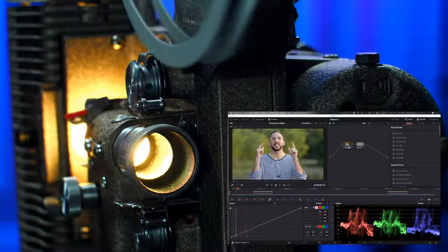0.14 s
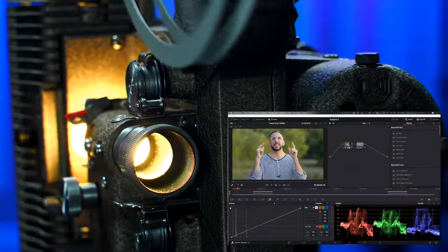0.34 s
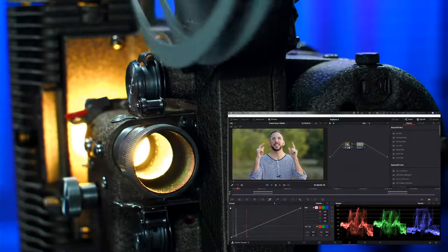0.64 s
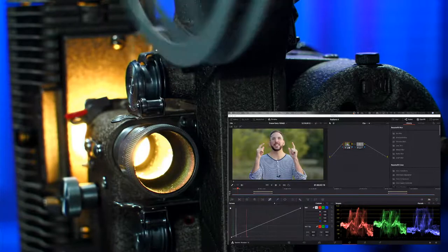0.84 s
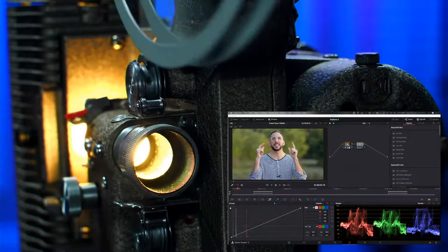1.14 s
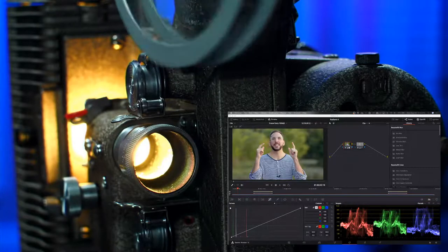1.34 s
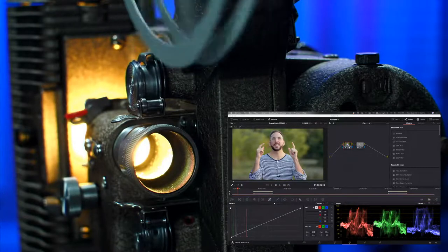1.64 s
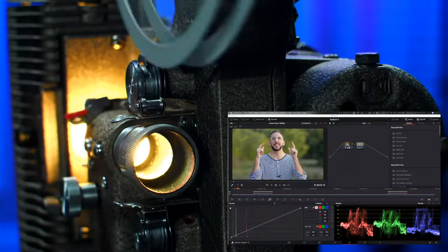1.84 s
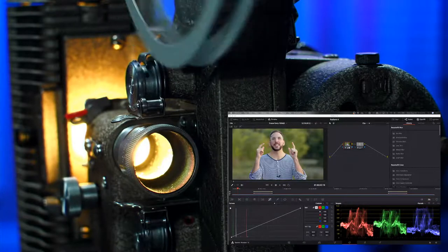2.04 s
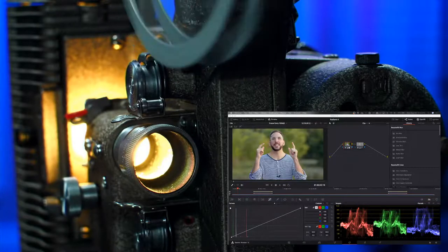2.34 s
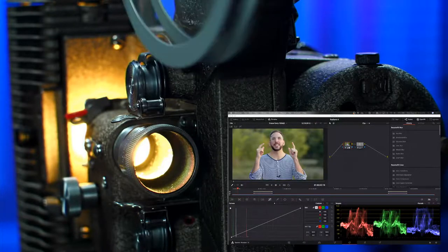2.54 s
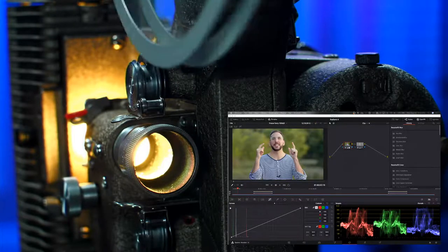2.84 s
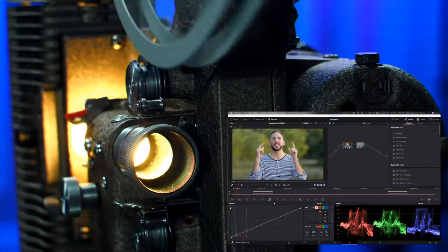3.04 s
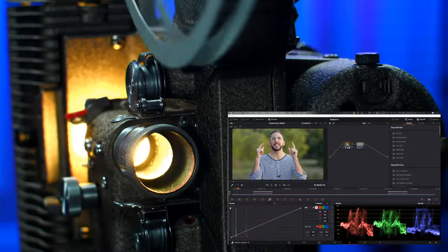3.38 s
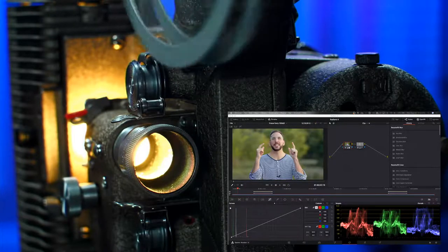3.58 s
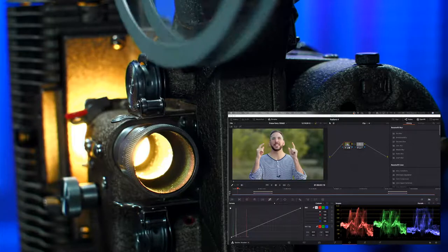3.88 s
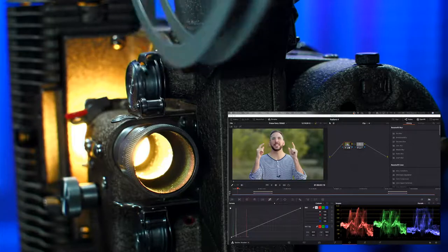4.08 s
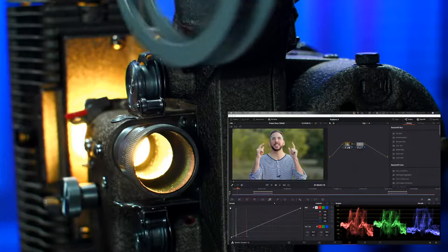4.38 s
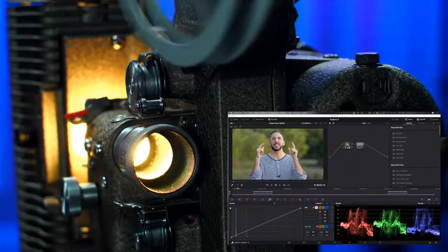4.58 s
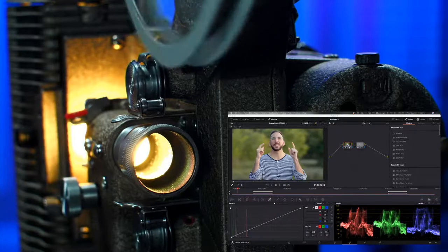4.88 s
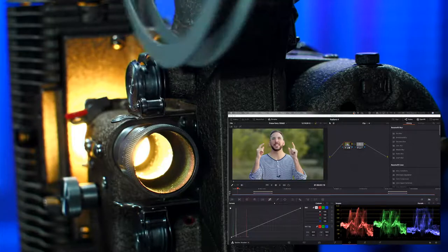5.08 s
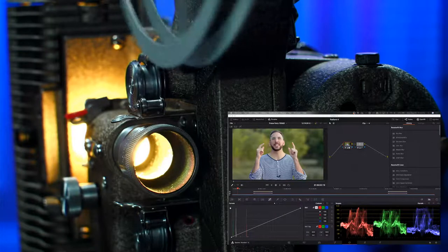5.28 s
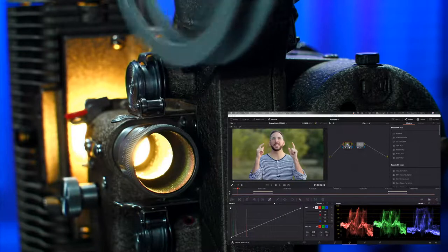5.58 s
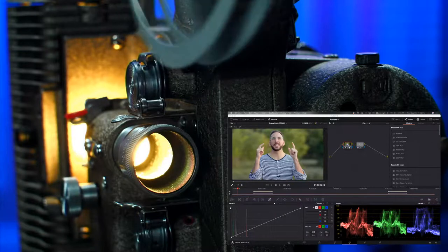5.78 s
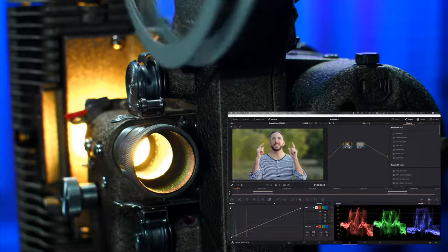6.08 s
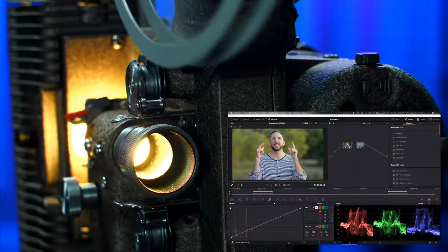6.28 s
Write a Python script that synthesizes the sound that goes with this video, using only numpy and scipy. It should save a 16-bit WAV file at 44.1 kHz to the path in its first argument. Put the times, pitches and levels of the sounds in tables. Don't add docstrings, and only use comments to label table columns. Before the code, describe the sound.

From 0 to about 6.4 seconds an old film projector runs without a break, close to one microphone indoors, dry and mono. The motor gives a rough, many-toned hum, strongest from about 500 to 1800 hertz, with idler gear tones beating against it and a shutter drone and roller whirr blended in. A loose panel buzzes most clearly in the first second, then its tone shifts and weakens as the motor speeds up slightly until about 2 seconds, later varying gently. Bright steel ticks repeat about sixteen times a second, some harder, as near 1.2 and 5.7, some weaker, as near 2.0 and 2.6, each followed by a faint return tick. A high, gritty bearing scrape flutters about seventy-six times a second, easing briefly near 2.0 and swelling around 2.7. Cooling fan air rushes constantly through the housing over very faint mains hum and hiss. The sound cuts off still running.

```python
import sys
import numpy as np
from scipy import signal
from scipy.fft import rfft, irfft, next_fast_len
from scipy.io import wavfile

SR = 44100
rng = np.random.default_rng(int(sys.argv[2]) if len(sys.argv) > 2 else 0)


def generate_wav(signal):
    frames = np.transpose(np.atleast_2d(signal))
    scaled = np.clip(frames, -1, 1) * 32767
    pcm = np.round(scaled).astype(np.int16)
    wavfile.write(sys.argv[1], SR, pcm)


def to_linear_factor(level_db):
    exponent = np.asarray(level_db, float) / 20
    return 10 ** exponent


N = 283122

FIRST_STROKE, FRAME = 1.4, 4.775
BLADES = 3 / FRAME


def unit(x):
    return x / np.sqrt(np.mean(x ** 2) + 1e-20)


def over_time(rows):
    start_s, value = np.transpose(rows)
    return np.interp(np.arange(N) / SR, start_s, value)


def straight_pieces(knots, rate):
    return np.interp(np.arange(N) * rate / SR, np.arange(len(knots)), knots)


def wobble(rate):
    return straight_pieces(rng.standard_normal(int(N * rate / SR) + 2), rate)


def sway(depth_db, rate):
    knots = rng.standard_normal(int(N * rate / SR) + 2)
    return straight_pieces(to_linear_factor(depth_db * knots), rate)


def filtered(x, response):
    m = next_fast_len(N + 8192)
    return irfft(rfft(x, m) * response(np.fft.rfftfreq(m, 1 / SR)), m)[:N]


def resonances(modes):
    def response(f):
        total = 0
        for k, (pitch, width, db) in enumerate(modes):
            damping = 1j * f * width
            total = total + (-1) ** k * to_linear_factor(db) * damping / (pitch * pitch - f * f + damping)
        return total
    return response


# start_s, speed [turns a second]
SHAFT_SPEED = [(0.0, 75.18), (0.64, 75.538), (1.28, 75.658), (1.93, 76.182), (2.57, 76.084), (3.21, 75.817),
               (3.85, 75.842), (4.49, 75.744), (5.14, 75.765), (5.78, 75.898), (6.42, 76.122)]


def speed():
    reel_turn_s = .87
    reel = 2 * np.pi * np.arange(N) / SR / reel_turn_s
    return over_time(SHAFT_SPEED) + .118 * np.cos(reel) + .05 * np.cos(2 * reel + 2.29)


def turns():
    return np.cumsum(speed()) / SR


def drone(orders, levels_db, unsteady_db, rate):
    knock_at = .955
    since_knock = turns() - knock_at
    total = 0
    for order, db in zip(orders, levels_db):
        loose = rng.standard_normal() * (.12 if order > 24.5 else 9)
        phase = ((order * since_knock + loose) % 1).astype(np.float32)
        total = total + to_linear_factor(db) * sway(unsteady_db, rate) * np.cos(2 * np.pi * phase)
    return np.sqrt(2) * total


# order [multiple of the shaft], level_db [rms]
SHAFT_ORDERS = [(1, -87.4), (4, -64.5), (5, -65.5), (6, -57.0), (7, -43.5), (8, -47.0), (9, -56.1),
                (10, -51.3), (11, -44.1), (12, -61.7), (14, -61.4), (15, -50.9), (16, -53.6), (17, -59.2),
                (18, -54.3), (19, -66.9), (20, -59.4), (21, -52.2), (22, -62.9), (23, -48.8), (25, -68.4),
                (26, -57.5), (27, -66.0), (28, -69.4), (31, -62.9), (33, -63.1), (34, -63.1), (38, -62.4),
                (39, -69.0)]


def motor():
    steady = [row for row in SHAFT_ORDERS if row[0] not in (10, 16)]
    order, level_db = np.transpose(steady)
    return drone(order, level_db, unsteady_db=1.13, rate=12)


# shaft [multiple of the shaft], idler [multiple of the idler, 0 for the
# shaft alone], level_db [rms]
MESH_TONES = [(7, -1, -56.5), (8, -1, -59.1), (9, -1, -60.3), (10, 1, -47.5), (10, 2, -60.8),
              (11, -1, -54.9), (12, -2, -59.1), (14, 1, -54.5), (15, -1, -51.5), (15, 1, -55.2),
              (16, -1, -57.3), (16, 1, -60.1), (16, 2, -59.3), (17, -2, -59.0), (17, -1, -59.0),
              (17, 1, -57.8), (19, -1, -59.5), (19, 1, -57.6), (20, 1, -59.7), (20, 3, -58.2),
              (21, -1, -55.8), (21, 1, -56.6), (21, 2, -59.3), (22, -1, -57.2), (22, 1, -48.3),
              (22, 2, -57.6), (23, -2, -55.9), (23, -1, -53.5), (24, -2, -58.9), (24, -1, -59.0),
              (3, 0, -70), (6, 1, -62.5), (7, 1, -62.5), (9, 1, -62.5), (11, 1, -64.5), (13, -1, -66),
                    (18, 1, -67), (23, 1, -64), (27, -1, -68), (27, 1, -68), (28, -1, -69), (29, -1, -65.5),
                    (30, 0, -69), (30, 1, -66.5), (32, -1, -71), (32, 0, -69.5), (32, 1, -71),
                    (35, -1, -66.5), (35, 0, -69), (36, 1, -69.5), (37, 0, -70.5), (37, 1, -70),
                    (40, 0, -71), (41, 0, -69.5), (43, 0, -70.5), (46, 0, -71), (50, 1, -74), (55, 0, -75),
                    (57, 0, -72), (77, 0, -77)]


def gear_mesh():
    idler_ratio = .6535
    shaft, idler, level_db = np.transpose(MESH_TONES)
    return drone(shaft + idler_ratio * idler, level_db, unsteady_db=3.5, rate=12)


# order [multiple of the blade rate], level_db [rms]
SHUTTER_ORDERS = [(2, -80.5), (3, -73.5), (4, -89), (5, -65.5), (7, -59), (9, -63), (10, -59.5), (11, -73),
                  (12, -54.5), (14, -60), (18, -69), (19, -70), (26, -78)]


def shutter():
    order, level_db = np.transpose(SHUTTER_ORDERS)
    return drone(BLADES * order, level_db, unsteady_db=1.5, rate=8)


# speed [turns a second], shaft_level_db [tenth shaft order, rms],
# blade_level_db [fifteenth blade order, rms]
PANEL_LEVELS = [(75.25, -41.5, -48), (75.55, -43.5, -54), (75.7, -45.5, -56), (75.85, -50, -51),
                (76.0, -57, -49), (76.2, -61, -44.5)]


def panel():
    turns_a_second, shaft_level_db, blade_level_db = np.transpose(PANEL_LEVELS)
    shaft_db = np.interp(speed(), turns_a_second, shaft_level_db)
    blade_db = np.interp(speed(), turns_a_second, blade_level_db)
    return drone((10, 16, 15 * BLADES), (shaft_db, shaft_db - 5, blade_db), unsteady_db=1.5, rate=12)


# order [multiple of the shaft], level_db [rms]
ROLLER_TONES = [(4.941, -64), (6.252, -64), (6.88, -63), (7.581, -60), (9.447, -60), (10.418, -56),
                (10.874, -58), (11.938, -62), (12.58, -50), (14.163, -60), (14.66, -59), (17.59, -63)]


def rollers():
    order, level_db = np.transpose(ROLLER_TONES)
    return drone(order, level_db, unsteady_db=1.5, rate=4.3)


RUB_PRESSURE = [
    (0, -3),
    (.16, -0.5),
    (.22, -2.4),
    (.38, 0),
    (.44, 0.3),
    (.55, 0.5),
    (.62, 4),
    (.72, 0.2),
    (.8, -2),
    (1, -0.9),
]
# start_s, level_db
BEARING_LOAD = [(0, 0), (.9, 1), (1.4, -1), (1.7, 0), (1.97, -4), (2.2, 0), (2.7, 2), (3.2, 0), (4.1, 1.5),
                (4.6, 0.5), (4.8, 1.2), (5.3, -0.5), (6.05, -0.3), (6.3, 1.5), (6.42, -1)]
# pitch_hz, width_hz, level_db
RACE_MODES = [(12100, 1000, -0.5), (13730, 640, -1), (14900, 800, -7), (15720, 150, -15)]
# pitch_hz, width_hz, level_db
CAGE_MODES = [(8380, 430, -3), (9080, 680, -4.5), (10800, 760, -8.5)]


def bearing():
    turn = turns()
    bite = 0.4 * rng.standard_normal(int(turn[-1]) + 2)[turn.astype(int)]
    cam = 0.48 * np.cos(4 * np.pi * (turn - FIRST_STROKE) / FRAME)
    grit = 1.07 * wobble(300) + 0.36 * wobble(60)
    pressure = np.interp(turn % 1, *np.transpose(RUB_PRESSURE)) + bite + cam + grit
    race_db = 8.8 * np.tanh(2.4 * pressure) + 0.48 * wobble(500)
    cage_db = 6.5 * np.tanh(pressure + .9 * wobble(120)) + 0.92 * wobble(250)
    race = to_linear_factor(race_db) * rng.standard_normal(N)
    cage = to_linear_factor(cage_db) * rng.standard_normal(N)
    steel = resonances(RACE_MODES)
    race = unit(filtered(race, lambda f: steel(f) * np.abs(steel(f)) ** .5))
    cage = unit(filtered(cage, resonances(CAGE_MODES)))
    load_db = over_time(BEARING_LOAD)
    return to_linear_factor(-48.3 + load_db) * race + to_linear_factor(-50 + 0.96 * load_db) * cage


def strokes(times, peaks_db, modes, rise, fall, clean, shift):
    size = 2048
    t = np.arange(size) / SR - .003
    envelope = to_linear_factor(-60 * np.where(t < 0, -t / rise, t / fall))
    blow = envelope * rng.standard_normal((len(times), size))
    held = 1 + shift * rng.standard_normal((len(times), 1))
    blow[:, round(.0027 * SR)] += clean
    rings = irfft(rfft(blow) * resonances(modes)(np.fft.rfftfreq(size, 1 / SR) * held), size)
    rings = rings * (to_linear_factor(peaks_db) / np.abs(rings).max(axis=1))[:, None]
    at = np.round((times + t[0]) * SR).astype(int)[:, None] + np.arange(size)
    return np.bincount(at.ravel(), rings.ravel(), N + SR)[:N]


# start_s, bright_level_db, low_level_db
ODD_STROKES = [(0.4, -2, -4.5), (0.66, -2, 1), (0.78, 1, -10), (1.03, -2, -2), (1.16, 5, 1),
               (1.22, 2.5, -2), (1.29, 4, 1.0), (1.35, -2, -4), (1.73, -4, 3), (1.85, 1, 2),
               (2.04, -9.5, -3), (2.1, 3.5, 0.0), (2.29, -3, -7.0), (2.61, -12, -10), (2.67, 2, 0),
               (2.73, -5.0, -7), (2.98, -3, -3), (3.3, 3.5, -1), (3.74, 1, 3), (3.99, -8.0, -1),
               (4.05, -4.5, -2), (4.18, 1.5, -2.5), (4.31, -5, -8), (4.49, 1, -4.0), (4.56, -4, -4.0),
               (4.81, 1, -8), (4.94, -2, 0), (5.57, -4.5, -4.0), (5.69, 6, 1), (6.13, -5, -1)]
# pitch_hz, width_hz, level_db
BRIGHT_MODES = [(5400, 92, -5), (6600, 80, -9), (7260, 94, -7.5), (8010, 130, -6), (8040, 320, -6.5),
                (8800, 350, 1.5), (9380, 560, 3), (9580, 660, 1), (10300, 520, -11), (12000, 1460, -16.5)]
# pitch_hz, width_hz, level_db
LOW_MODES = [(2040, 210, -13), (2700, 230, -5), (3590, 98, 2.5), (4250, 100, -14), (4700, 345, 4.5),
             (4980, 180, 1.5), (4900, 53, -9)]
# pitch_hz, width_hz, level_db
RETURN_MODES = [(3530, 170, 7), (5530, 200, -3), (6270, 84, 6), (6250, 58, 12.5), (6440, 120, 4),
                (7100, 100, -3), (7320, 110, 3.5)]


def claw():
    usual_db, scatter_db = (-27.5, -32.5, -41.5), (2, -1.8, 1.5)
    bite_after = .232
    play_s, return_s = .00015, .0097
    turn = turns()
    bites = np.arange(FIRST_STROKE + bite_after, turn[-1], FRAME)
    times = np.interp(bites, turn, np.arange(N) / SR)
    over_db = rng.standard_normal((len(times), 3)) * scatter_db
    times = times + play_s * rng.standard_normal(len(times))
    start_s, *odd_db = np.transpose(ODD_STROKES)
    nearest = np.abs(times - start_s[:, None]).argmin(axis=1)
    over_db[nearest, :2] = np.transpose(odd_db)
    bright_db, low_db, back_db = np.transpose(over_db + usual_db)
    bright = strokes(times, bright_db, BRIGHT_MODES, rise=0.011, fall=0.0088, clean=8.3, shift=0.0088)
    low = strokes(times, low_db, LOW_MODES, rise=0.0074, fall=0.011, clean=8.9, shift=0.032)
    back = strokes(times + return_s, back_db, RETURN_MODES, rise=0.012, fall=0.051, clean=2.8, shift=.005)
    return bright + low + back


# pitch_hz, level_db [per Hz]
FAN_AIR = [(25, -38), (70, -36), (110, -10.5), (200, -1.5), (270, 4.5), (500, 1.5), (2000, 1), (5000, -0.5),
           (7500, -4), (11000, -3), (15800, -29)]
# pitch_hz, width_hz, level_db
HOUSING_MODES = [(594, 213, -9), (720, 70, -6), (811, 30, 1.5), (920, 56, -7.5), (1153, 203, -5),
                 (1380, 100, -2.5), (1494, 200, -3), (1670, 80, -3), (1748, 63, -2.5), (2168, 160, -7.5),
                 (2252, 90, -5.5), (2613, 110, -10), (2870, 210, -11.5), (3280, 210, -14), (3433, 124, -9),
                 (4110, 240, -17.5), (4190, 98, -10.5), (4730, 410, -17.5), (5100, 54, -9.5),
                 (6000, 450, -25), (6810, 200, -19), (7060, 64, -22)]


def fan():
    pitch_hz, level_db = np.transpose(FAN_AIR)
    rattle = to_linear_factor(wobble(220)) * rng.standard_normal(N)
    air = filtered(rattle, lambda f: to_linear_factor(np.interp(np.log(f + 1), np.log(pitch_hz), level_db)))
    body = resonances(HOUSING_MODES)
    rush = filtered(air, lambda f: np.abs(body(f)) + to_linear_factor(-23.5))
    return to_linear_factor(-38.5 + 0.13 * wobble(5.5)) * unit(rush)


def mains_hum():
    return to_linear_factor(-76.5 + 1.5 * wobble(3.8)) * np.sin(2 * np.pi * 120 * np.arange(N) / SR)


def scene():
    tones = motor() + gear_mesh() + shutter() + panel() + rollers()
    return (tones + bearing() + claw() + fan() + mains_hum())[None]


def top_cut(x):
    return signal.sosfilt(signal.butter(12, 15870, fs=SR, output="sos"), x)


def record(dry):
    top_hz = 15860
    hiss = to_linear_factor(-67.5) * rng.standard_normal(N)
    mix = filtered(dry[0] + hiss, lambda f: f < top_hz)[None]
    return top_cut(mix)


dry = scene()
out = record(dry)
generate_wav(out)
```